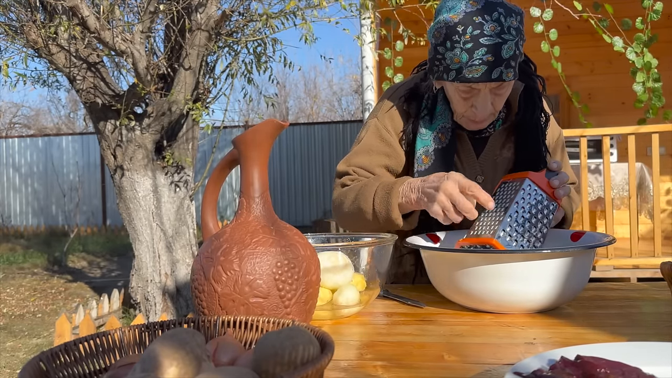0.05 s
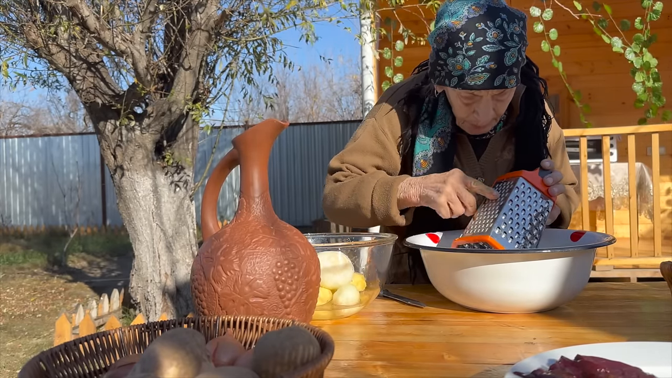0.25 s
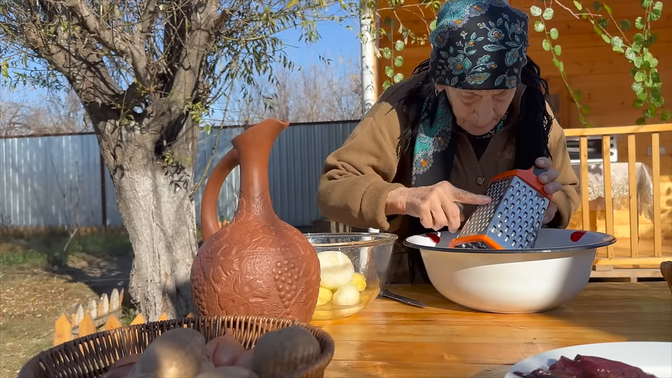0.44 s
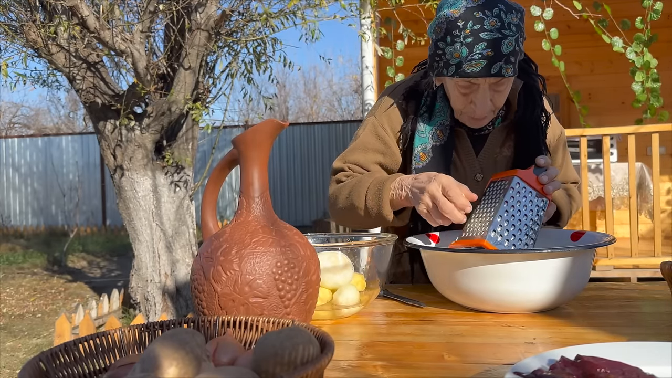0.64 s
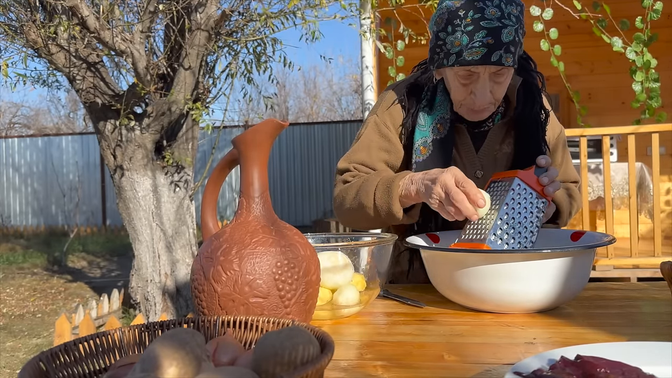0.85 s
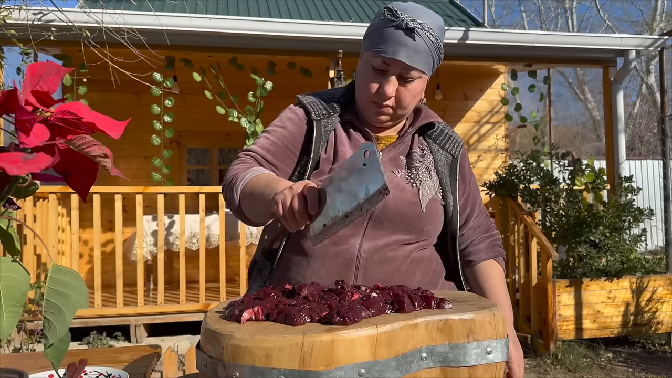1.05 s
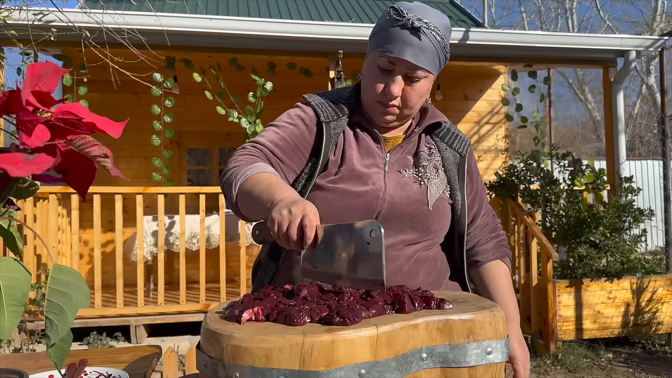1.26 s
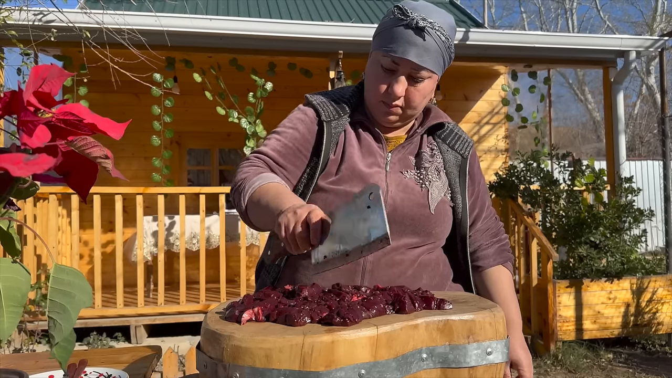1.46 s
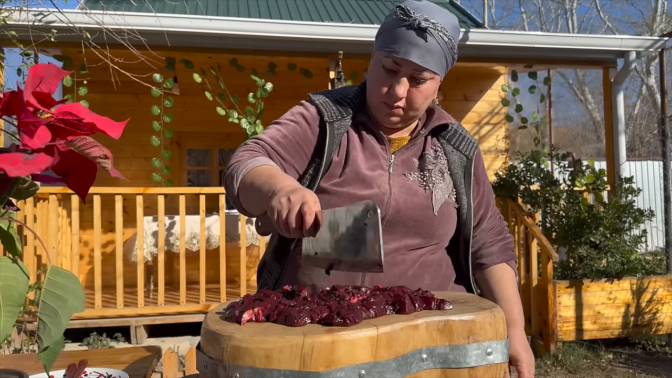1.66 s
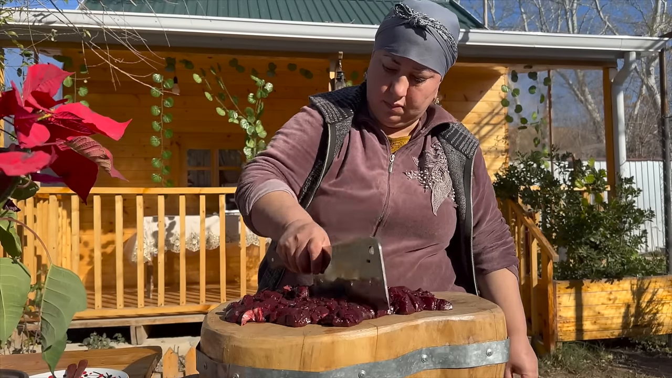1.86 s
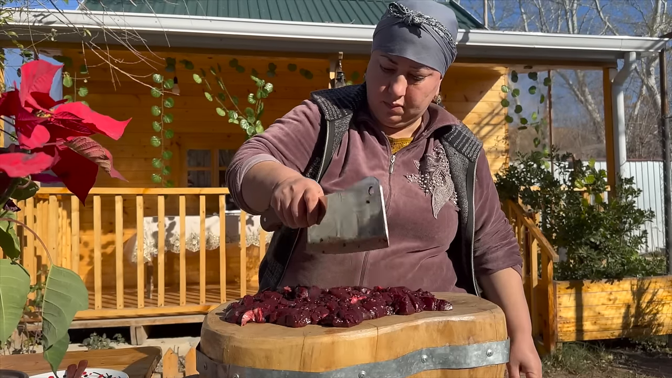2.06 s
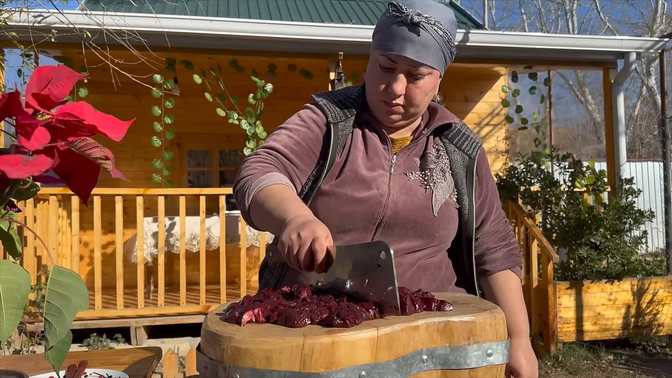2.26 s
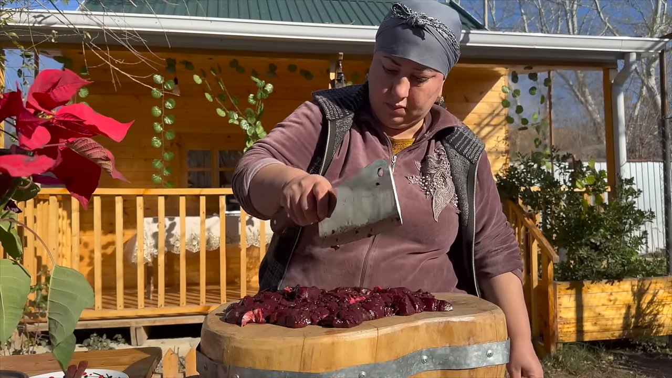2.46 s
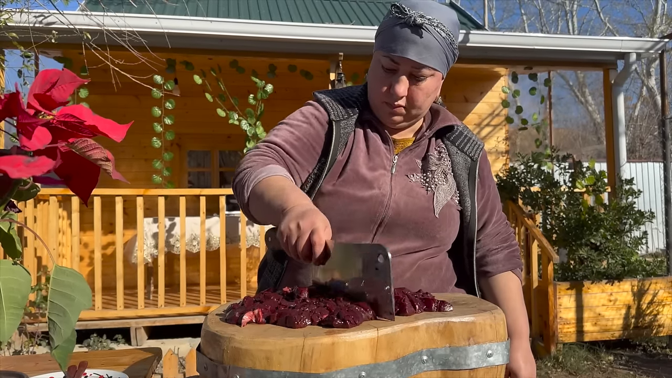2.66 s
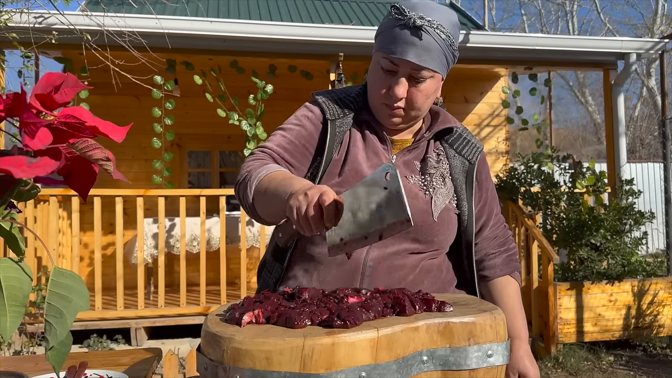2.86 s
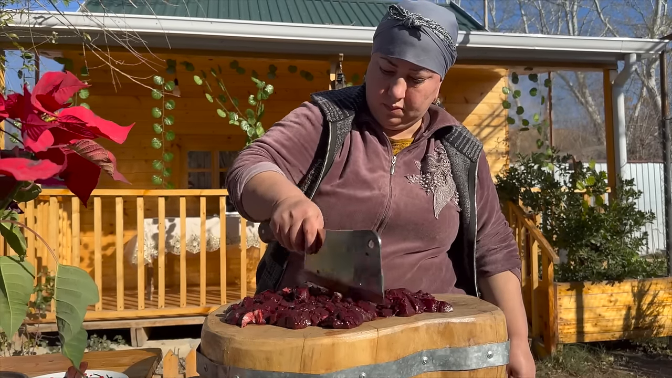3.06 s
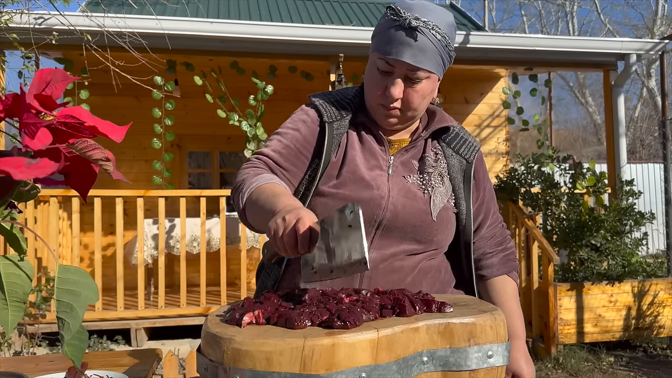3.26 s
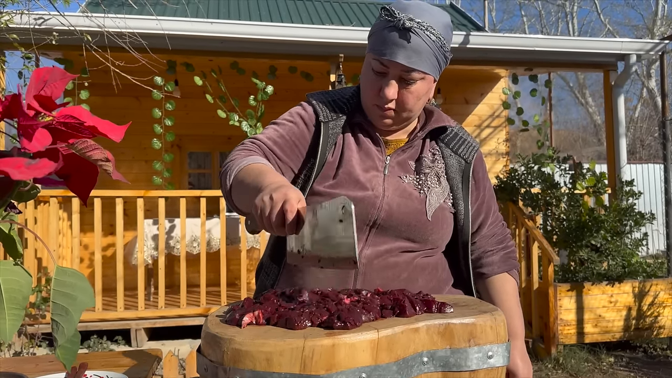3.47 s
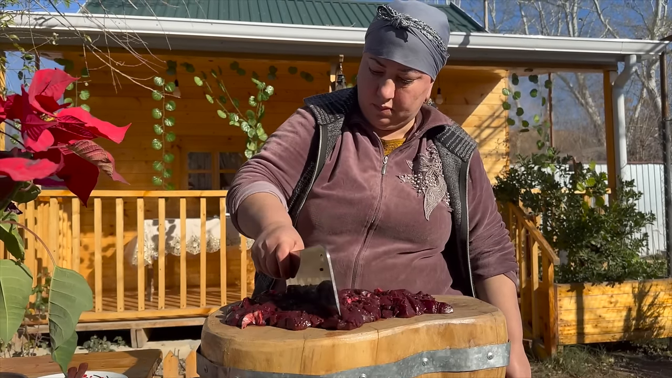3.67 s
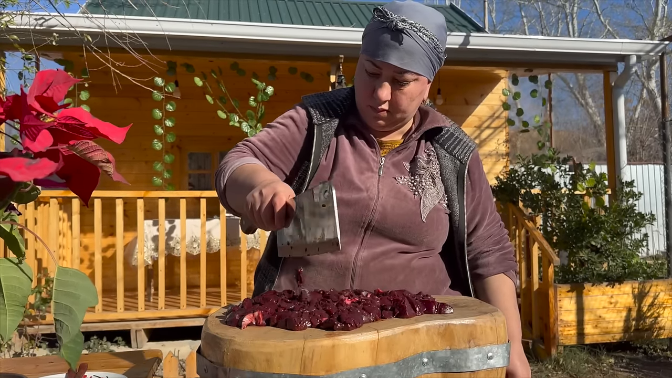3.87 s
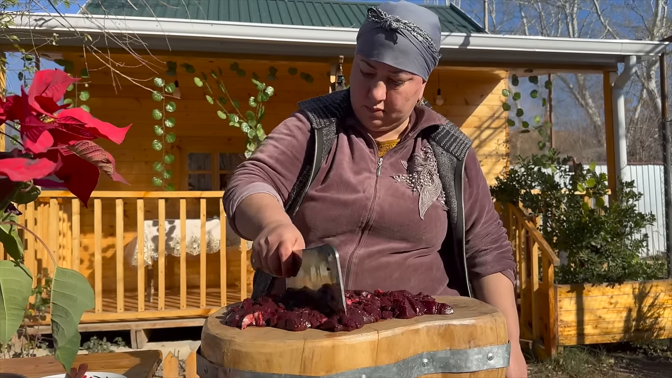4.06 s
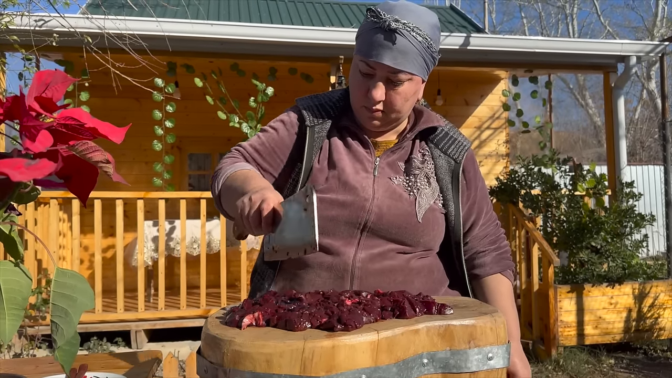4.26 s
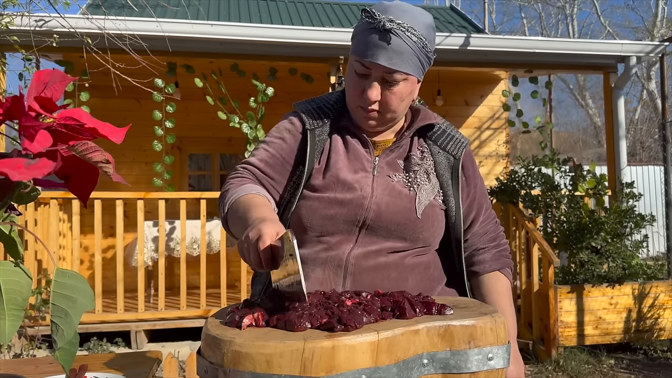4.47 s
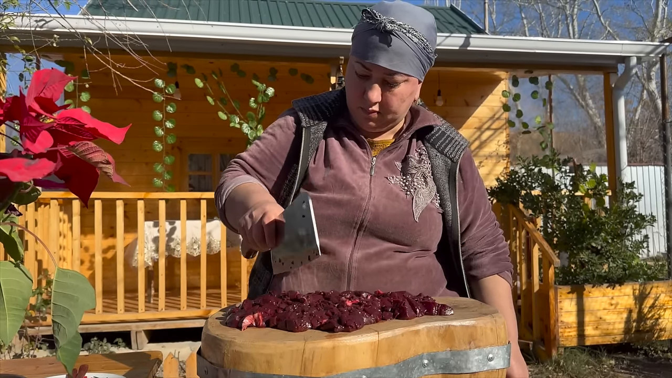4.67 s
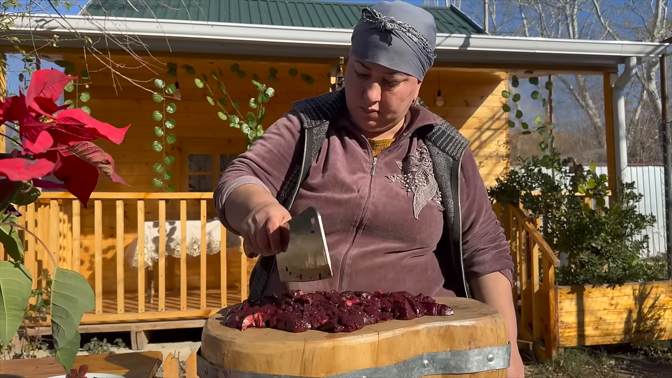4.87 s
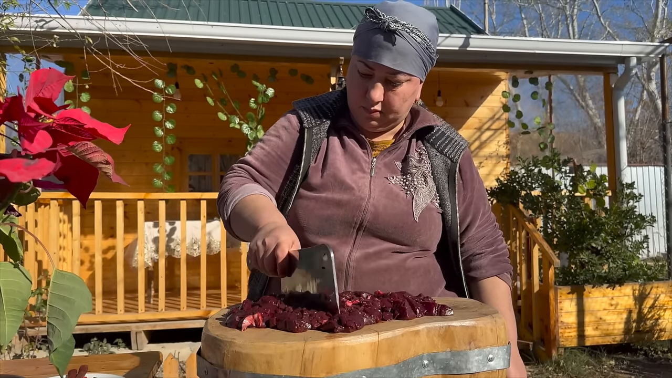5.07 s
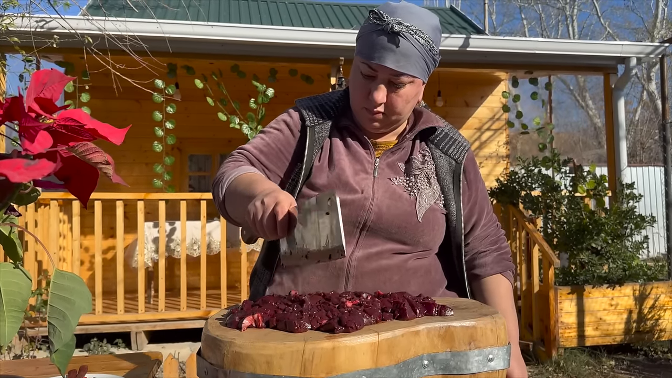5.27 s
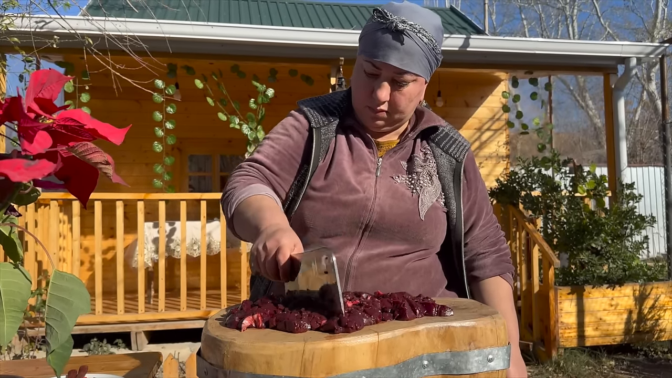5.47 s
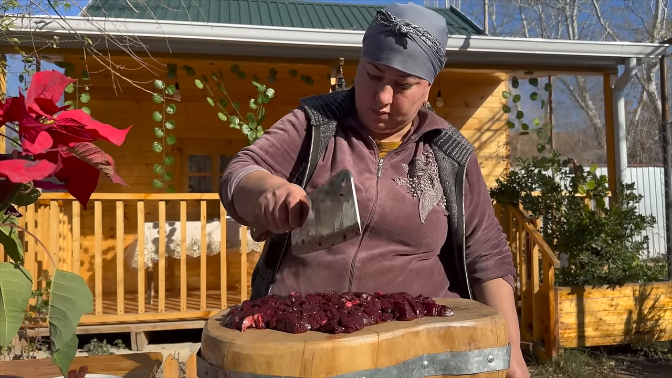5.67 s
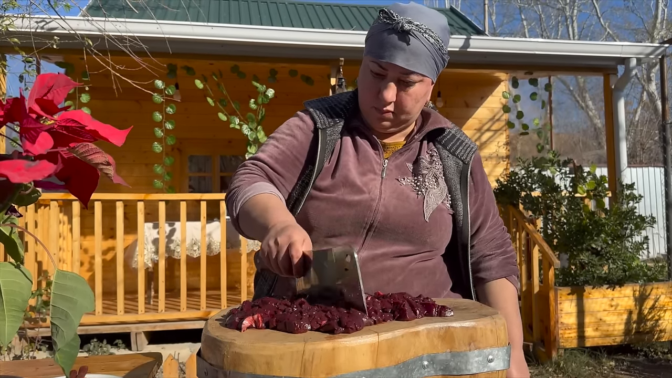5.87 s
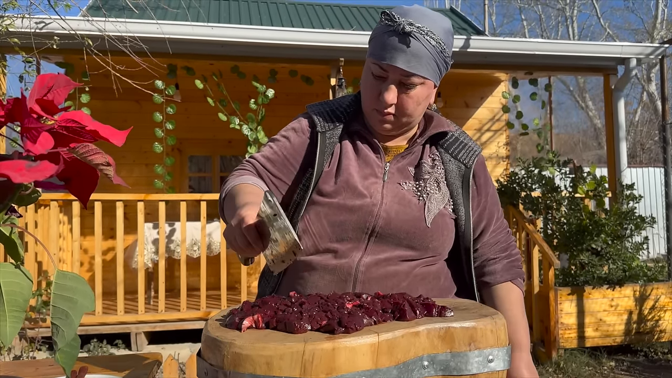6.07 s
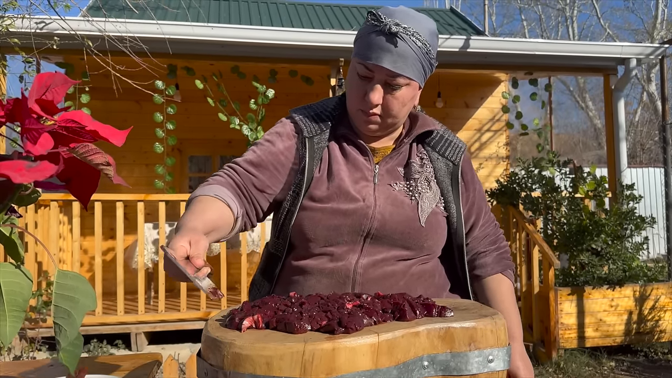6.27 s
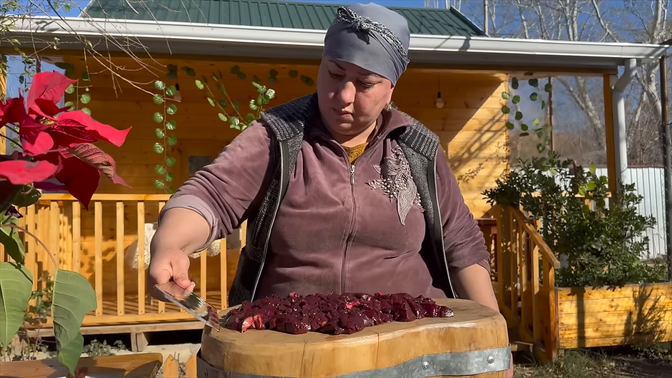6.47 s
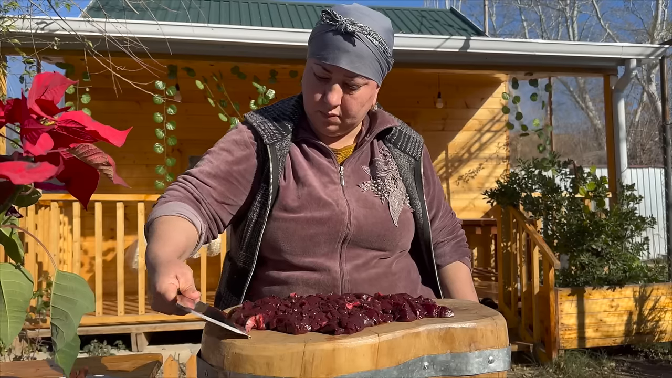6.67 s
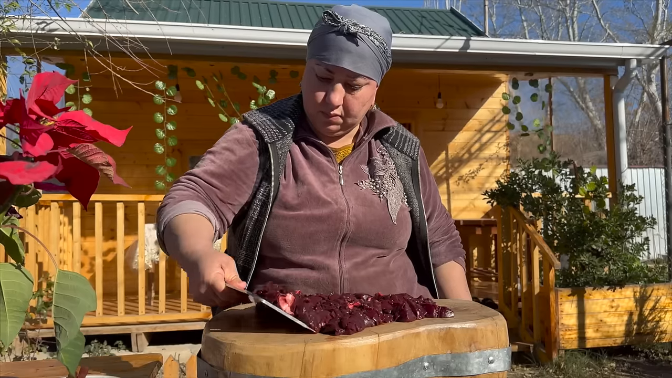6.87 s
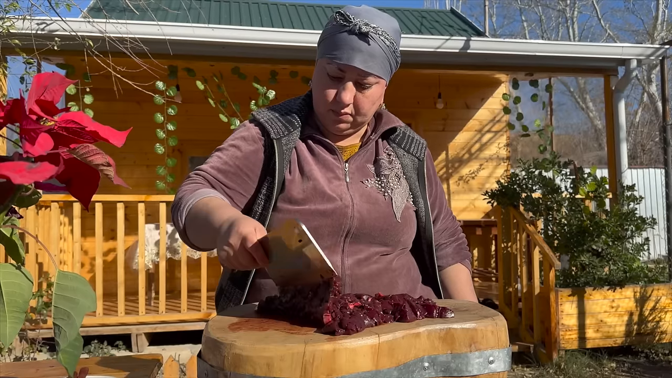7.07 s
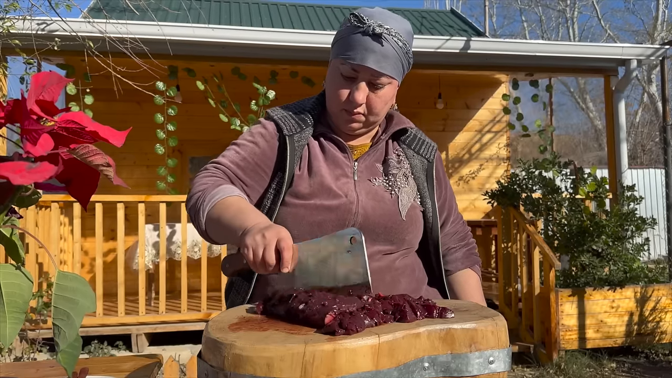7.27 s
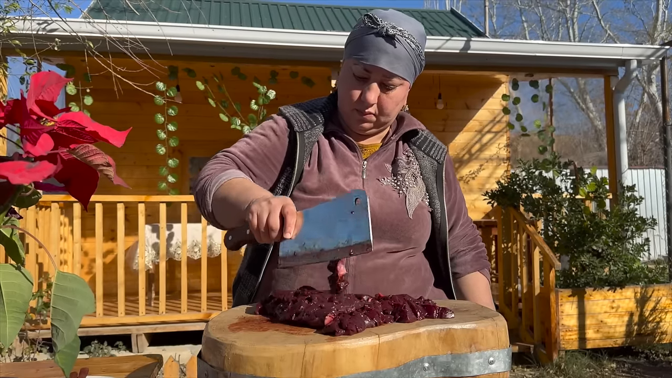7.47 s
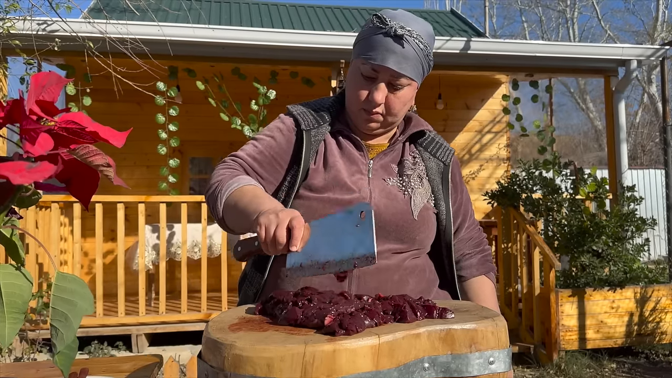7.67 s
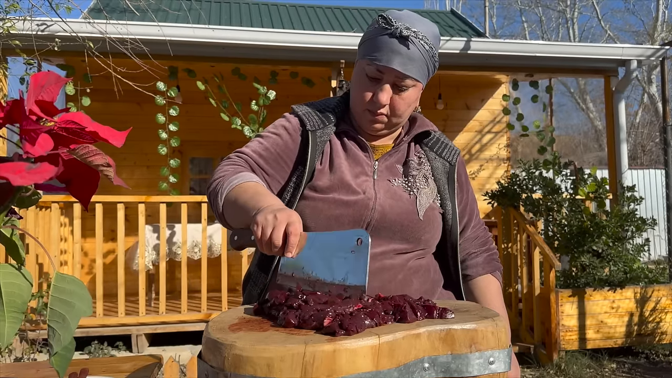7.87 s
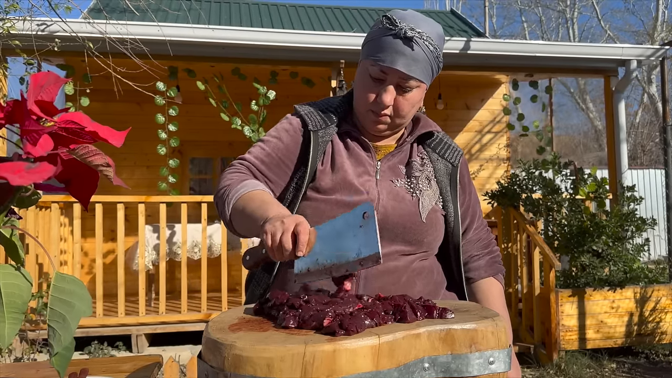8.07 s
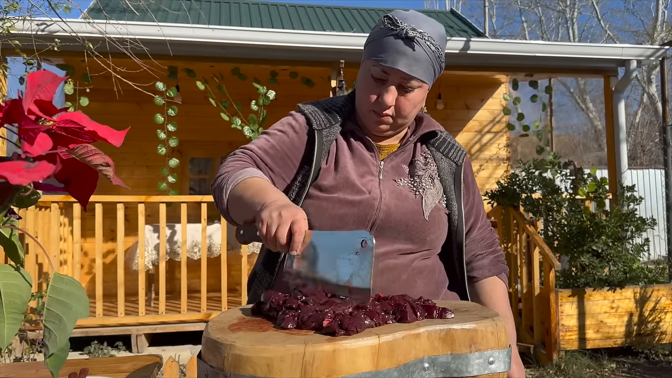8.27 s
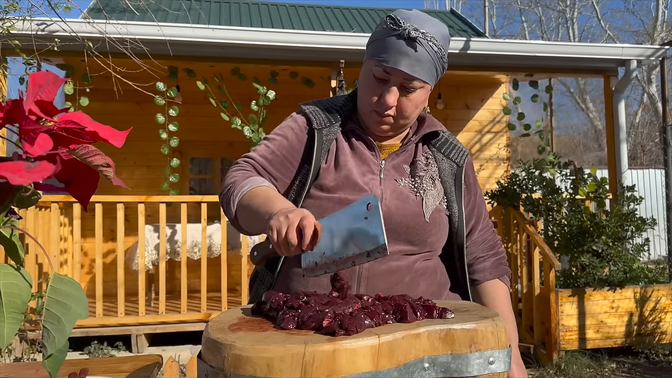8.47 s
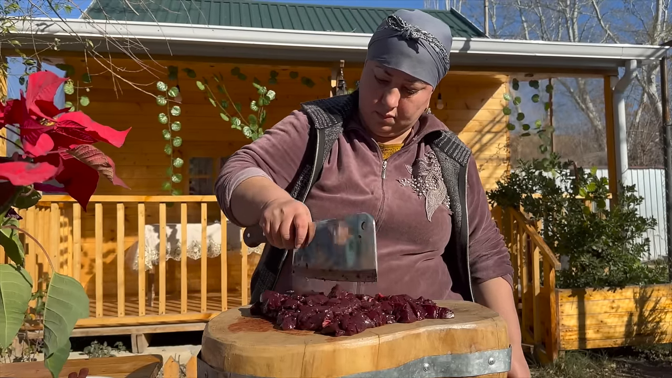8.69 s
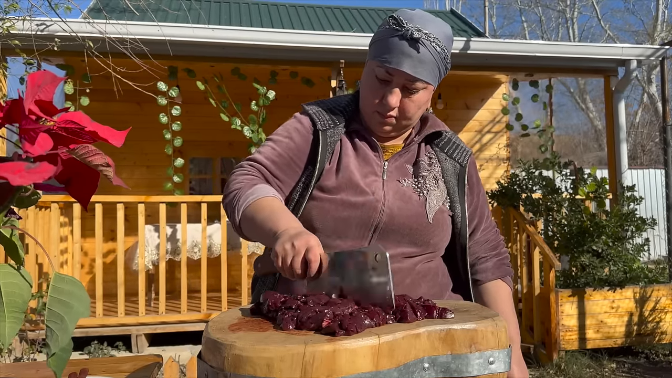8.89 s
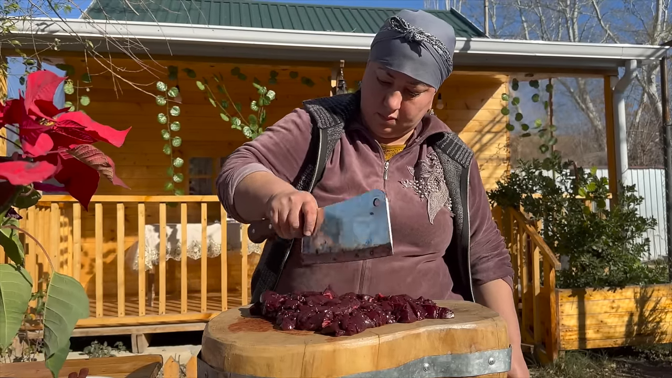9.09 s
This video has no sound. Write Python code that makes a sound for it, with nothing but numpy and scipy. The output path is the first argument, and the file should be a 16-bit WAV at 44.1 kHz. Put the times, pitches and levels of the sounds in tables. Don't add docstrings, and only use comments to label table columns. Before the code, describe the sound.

Outdoor yard beside a wooden porch, heard fairly close: quiet onion grating with a soft bowl knock, then a sudden change to regular, loud cleaver chops through wet meat into wood. Sticky clicks follow as the blade lifts. Midway the blade slaps flat and drags with a short steel-on-wood scrape and wet folding sounds, before a few spaced, softer chops. Faint traffic, wind buffeting and thin bird calls lie beneath.

```python
import sys
import numpy as np
from scipy import signal
from scipy.fft import rfft, irfft, next_fast_len
from scipy.io import wavfile
from scipy.ndimage import uniform_filter1d, map_coordinates

SR = 44100
rng = np.random.default_rng(int(sys.argv[2]) if len(sys.argv) > 2 else 0)


def unload_audio(sound):
    columns = np.transpose(np.atleast_2d(sound))
    steps = np.round(np.clip(columns, -1, 1) * 32767)
    wavfile.write(sys.argv[1], SR, steps.astype(np.int16))


def ratio(d):
    e = np.asarray(d, float) / 20
    return 10 ** e


N = 402633
T = np.arange(N) / SR

# t/s, wood level/dB, thump level/dB above wood, blade level/dB above wood, wood f/Hz
BLOWS = [(1.1765, -20, -5, 0, 1340), (1.5401, -23, -2, -3, 1596), (1.8899, -24, -4.5, -1.5, 1577),
         (2.2546, -29.5, 1.5, -3, 1287), (2.6218, -23, 0.5, 4.5, 1320), (2.983, -44, 3, 1.5, 1230),
         (3.3335, -21.5, -1.5, 0, 1542), (3.681, -27.5, -3, -5, 1605), (4.0373, -24, -4, -6.5, 1210),
         (4.3919, -27.5, -6, -10, 1158), (5.11, -16.5, -7.5, -4, 1575), (5.469, -21.5, 0, 1, 1400),
         (5.8227, -22.5, -2, -6, 1590), (6.5534, -41.5, -7.5, 5.5, 1970), (8.1539, -31, 0.5, -3, 1590),
         (8.9289, -24.5, -2, -5.5, 1590)]
# grain f/Hz, edge f/Hz, spine f/Hz, share of ring the meat leaves
SPOTS = [(673, 2940, 3990, .7), (885, 2840, 3990, 1.2), (860, 2560, 4290, .9), (896, 2450, 3960, .9),
         (735, 2500, 4050, .8), (635, 2230, 3540, 1.1), (894, 2820, 4110, 1.1), (886, 2970, 4010, 1.1),
         (880, 2610, 4050, 1.1), (883, 2300, 4390, 1.1), (881, 2860, 3390, .9), (657, 2380, 3980, 1.1),
         (899, 2200, 3850, 1.1), (923, 2470, 3890, 1.1), (883, 2410, 3680, 1.1), (894, 2180, 3930, .9)]
# low grain level/dB, high grain level/dB, edge level/dB, spine level/dB
REACH = [(-4, 6, 4, 2), (1, 2, 0, -2), (-6, 4, -1, 1), (7, 0, -1, 3), (-2, 1, -1, 0), (-3, 1, 0, 4),
         (0, 1, 0, -2), (2, 1, -2, 6), (3, 1, -3, -4), (1, -4, 0, -3), (1, 1, 4, 5), (-3, -2, 0, -1),
         (2, -3, -3, 2), (2, -2, 0, 3), (4, -1, 3, -4), (3, -1, -2, -3)]
# f/Hz, level/dB, t60/s
LOG_THUMP = [(200, -3, 0.022), (268, 2.5, 0.02), (355, 0.5, 0.032), (430, 2, .028), (499, 3, .028)]
# f/Hz, level/dB, t60/s
WOOD_GRAIN = [(610, -8.5, .026), (720, -6, 0.024), (1030, -10, .02), (1400, -7.5, 0.024), (1590, -15, .06)]
# f/Hz, level/dB, t60/s
BLADE_RING = [(2180, -4.5, .012), (2600, -8, 0.012), (3400, -8, 0.011), (4200, -10, .011),
              (4800, -9, 0.009), (5530, -9.5, .009), (6490, -18, 0.01)]
# f/Hz, level/dB, t60/s
FLAT_TAP = [(2490, 2.5, 0.067), (2800, -23, 0.099), (4200, -17.5, 0.12), (5620, -15, 0.02),
            (6700, -20, 0.06), (7240, -27, 0.059), (8800, -21, 0.043)]
# f/Hz, level/dB, t60/s
PORCH_HOLLOW = [(344, 0.5, 0.18), (200, -6, 0.054)]
# delay t/s, level/dB
ECHOES = [(.005, -23), (.012, -31.5), (.024, -36.5), (0.037, -38), (.084, -44), (.149, -53.5), (.21, -63.5)]
# f/Hz, t60/s
NEAR_SCATTER = [(150, 0.05), (500, 0.17), (1200, .14), (2400, 0.095), (5000, 0.042), (12000, 0.057)]
# f/Hz, t60/s
FAR_SCATTER = [(150, 0.12), (400, 0.25), (900, 0.72), (2000, .75), (3600, .66), (6000, 0.36), (12000, 0.15)]

# entry t/s, bottom t/s, wetness level/dB, crack level/dB at the bottom, pull-out fizz level/dB
CUTS = [(1.165, 1.176, -36, -27.5, -74.5), (1.526, 1.536, -52, -35, -81), (1.877, 1.888, -44, -36, -76.5),
        (2.242, 2.253, -47.5, -30, -76.5), (2.612, 2.62, -48, -30, -72), (2.977, 2.986, -42, -44, -73.5),
        (3.319, 3.331, -46, -35, -74), (3.657, 3.681, -48.5, -41, -72.5), (4.023, 4.035, -48, -40, -72.5),
        (4.378, 4.392, -47.5, -49, -79), (4.737, 4.75, -48, -50, -77.5), (5.097, 5.108, -47.5, -34, -72.5),
        (5.458, 5.469, -41.5, -35.5, -75), (5.81, 5.819, -53, -34, -79.5), (6.221, 6.234, -68.5, -79, -93),
        (7.733, 7.747, -44, -54, -84), (8.13, 8.153, -48, -47, -79.5), (8.534, 8.552, -48.5, -47.5, -86.5),
        (8.911, 8.923, -51, -33, -73.5)]
# f/Hz, level/dB per Hz
SPRAY = [(1000, -80), (3000, -15.5), (5000, -2), (8000, -4), (12000, -8.5), (16000, -18)]
# f/Hz, level/dB per Hz
SQUELCH = [(60, -60), (250, -10), (700, -4), (2500, 0), (4500, -4), (7000, -16), (12000, -60.5)]
# t/s, peak level/dB, f/Hz
SMACKS = [(.903, -58, 4970), (1.239, -47.5, 5200), (2.001, -56, 3500), (2.288, -53, 4700), (2.3, -46, 9940),
          (2.323, -47.5, 6000), (2.36, -54.5, 8800), (2.693, -51, 3400), (2.712, -46.5, 11800),
          (3.05, -56, 3800), (3.067, -56, 8300), (3.745, -53.5, 4000), (3.766, -59, 4800),
          (3.775, -52, 4400), (3.791, -53, 4800), (4.105, -54, 5400), (4.14, -51, 4400), (4.146, -48, 4400),
          (4.438, -60, 9100), (4.786, -54, 12100), (4.804, -54, 2900), (4.841, -55, 2693),
          (4.866, -53.5, 5800), (6.241, -57, 3200), (7.855, -51, 3700), (7.866, -53, 3400),
          (7.88, -56, 4100), (8.646, -48, 3110), (8.652, -48, 3400), (9.023, -56, 4500)]
# t/s, peak level/dB, f/Hz
FOLDS = [(6.839, -49, 3400), (6.851, -44, 11700), (6.874, -51, 2800), (6.883, -57, 3130),
         (6.907, -56, 3100), (6.934, -55, 4800), (6.941, -59, 4000), (6.957, -58, 3920), (6.973, -51, 8250),
         (7.0, -56.5, 4600), (7.058, -54, 6100), (7.31, -59, 3780), (7.328, -57, 9900),
         (7.415, -61.5, 6300), (7.441, -52, 9380), (7.544, -58, 14000)]
# t/s, peak level/dB, f/Hz
SPLATS = [(0.7692, -66, 2600), (0.8982, -66, 3700), (1.1726, -36, 5500), (1.2706, -59, 12400),
          (1.4963, -80, 7400), (1.53, -54, 6200), (1.8814, -41, 12400), (2.3369, -66, 10500),
          (2.7006, -68, 10500), (2.7532, -68, 7400), (3.037, -64, 7400), (3.0433, -62, 6200),
          (3.0627, -64, 6200), (3.0979, -67, 8800), (3.3147, -68, 4400), (3.3231, -45, 8800),
          (3.3281, -37, 7400), (3.3743, -68, 14800), (3.4132, -69, 14800), (3.4351, -64, 14800),
          (3.6719, -57, 12400), (3.6758, -58, 14800), (3.7387, -67, 14800), (3.7557, -55, 14800),
          (3.7948, -72, 7400), (3.8023, -72, 14800), (4.0308, -46, 10500), (4.1725, -67, 12400),
          (4.2012, -75, 7400), (4.383, -54, 10500), (4.4685, -64, 14800), (4.481, -64, 12400),
          (4.7394, -37, 12400), (4.7434, -50, 12400), (4.7502, -45, 2600), (4.7556, -53, 3100),
          (4.7611, -54, 14800), (4.7699, -52, 5200), (4.8809, -64, 14800), (5.0989, -54, 12400),
          (5.1031, -50, 14800), (5.2268, -65, 7400), (5.4583, -61, 3100), (5.4633, -36, 3100),
          (5.5845, -71, 10500), (5.8132, -52, 7400), (5.8182, -60, 8800), (6.2473, -71, 7400),
          (6.8322, -57, 8800), (6.8696, -62, 3100), (6.901, -62, 12400), (6.9175, -66, 10500),
         (6.9778, -66, 8800), (6.9841, -71, 12400), (7.0232, -67, 8800), (7.037, -67, 10500),
         (7.1031, -73, 2600), (7.2116, -70, 3100), (7.2168, -71, 8800), (7.23, -73, 10500),
         (7.236, -71, 12400), (7.258, -66, 2600), (7.2762, -73, 7400), (7.3048, -71, 3700),
         (7.3917, -71, 2600), (7.447, -65, 14800), (7.468, -66, 8800), (7.4765, -65, 7400),
         (7.7414, -51, 2200), (7.7471, -51, 6200), (7.7536, -54, 6200), (7.77, -57, 2200),
         (7.8284, -59, 5200), (7.8506, -63, 5200), (7.8741, -62, 7400), (7.9085, -75, 10500),
         (7.9334, -72, 10500), (8.0073, -79, 4400), (8.1245, -66, 10500), (8.1372, -50, 7400),
         (8.1464, -44, 14800), (8.2312, -62, 8800), (8.2894, -66, 4400), (8.3647, -72, 8800),
         (8.4038, -71, 12400), (8.4201, -71, 14800), (8.5343, -58, 6200), (8.5503, -53, 10500),
         (8.558, -49, 12400), (8.6159, -69, 8800), (8.6381, -68, 8800), (8.6742, -62, 5200),
         (8.8179, -78, 10500), (8.8476, -74, 4400), (8.9139, -56, 10500), (8.9179, -51, 12400),
         (8.9224, -51, 12400), (8.9938, -68, 7400), (9.0454, -62, 12400), (9.0796, -77, 10500)]
# t/s, fizz level/dB, time to fall 20 dB t/s
CLINGS = [(.905, -72, .025), (6.245, -72, .03), (6.83, -63, .22), (7.02, -77, .06), (7.06, -75, .05),
          (7.2, -85, .08), (7.265, -80, .05), (7.31, -72, .045), (7.41, -82, .05), (7.46, -79, .04),
          (7.78, -76, .06), (7.86, -67, .055), (7.93, -85, .09), (8.26, -82, .05), (8.61, -82, .05),
          (8.65, -63, .045)]
# f/Hz, level/dB per Hz
FIZZ = [(500, -60), (2000, -5.5), (3500, 0.5), (7000, -5), (12000, -6), (16000, -17)]

# t/s, steel level/dB
DRAG = [
    (6.558, -49),
    (6.61, -67.5),
    (6.65, -59.5),
    (6.69, -58),
    (6.75, -48),
    (6.775, -51.5),
    (6.8, -43.5),
    (6.83, -57.5),
    (6.895, -71),
]
# f/Hz, width f/Hz, level/dB
BLADE_RUB = [(2190, 23, -6), (2513, 56.5, 2), (3750, 40, -6), (3900, 90, -7), (5550, 150, -12),
             (6500, 53, -8.5), (7250, 45, -10.5), (11570, 62.8, -20.5)]
# f/Hz, width f/Hz, level/dB
BLOCK_RUB = [(253, 73, -3.5), (532, 60, 1), (1354, 44, -4)]
# f/Hz, level/dB per Hz
GRIT = [(160, -12), (538, -4.5), (821, -20), (1320, -3), (1680, -8), (3970, -2), (6000, -7), (16000, -32)]
# start t/s, hold t/s, tooth level/dB, body level/dB above it
STROKES = [
    (0.01, 0.09, -62.5, 2.5),
    (.14, .01, -82, 2),
    (0.212, .002, -79, -4),
    (0.253, .015, -80, 2),
    (.435, .002, -83, -11),
    (0.471, .002, -72, -4),
    (0.524, 0.022, -67, 2),
]
# f/Hz, width f/Hz, level/dB
GRATER = [(2180, 110, -11), (2500, 70, -3), (3340, 72, -14), (3830, 34, -0.5), (4560, 95, -17),
          (5600, 59, -13), (6600, 91, -14.5)]
# f/Hz, width f/Hz, level/dB
BOWL = [(674, 50, -3), (1022, 70, -3), (1320, 120, -6)]
# t/s, level/dB, f/Hz, t60/s
KNOCKS = [(.677, -59, 333, 0.049), (.767, -57, 629, 0.088), (.767, -64, 2500, .05), (.776, -68, 2700, 0.1),
          (.799, -45, 200, 0.093), (.799, -54.5, 324, 0.061), (.8, -52, 130, .09), (2.988, -27, 200, 0.032),
          (2.988, -42, 610, 0.023), (8.541, -50.5, 210, 0.057), (4.74, -55.5, 200, 0.056),
          (6.556, -34, 519, 0.058), (6.222, -52.5, 228, .05), (6.22, -59, 685, 0.044)]

# start t/s, length t/s, f/Hz, scoop up from f/Hz below, peak level/dB
BIRDS = [
    (.725, .085, 2165, -4, -74),
    (.812, .088, 2173, 0, -68),
    (1.303, .06, 4240, 1300, -58),
    (1.356, .34, 4240, 1301.5, -56),
    (1.415, 0.0485, 4220, 1200, -71.5),
    (4.576, 0.18, 4350, -0.5, -84.5),
    (6.901, .28, 4122, 0, -79),
    (8.27, .23, 4350, -4, -86),
    (8.68, 0.049, 7200, 1.5, -84),
]
# t/s, buffet level/dB
WIND = [(0, -60), (.4, -55), (.8, -59), (.92, -48.5), (1.5, -42.5), (2.2, -45.5), (2.55, -45), (2.88, -51),
        (3.24, -42), (3.55, -52.5), (4.3, -47), (4.8, -53.5), (5.8, -51), (6.15, -55), (6.48, -46.5),
        (7.56, -57.5), (8.2, -50.5), (9.13, -57)]
# f/Hz, level/dB per Hz
BUFFET = [(5, -120), (12, -15), (22, 2), (45, -3), (70, -21.5), (200, -120)]
# f/Hz, level/dB per Hz
RUMBLE = [(20, -120), (40, -20), (60, 0), (100, -5), (150, -20.5), (330, -27.5), (900, -120)]
# f/Hz, level/dB per Hz
HUSH = [(71, -30.5), (120, -0.5), (250, -12), (1130, -14.5), (4320, -30), (6010, -34.5), (13700, -37.5),
        (16500, -51.5)]
# f/Hz, width f/Hz, level/dB
MOTOR_HUM = [(73, 3, 0), (50, 5, -4)]


def unit(x):
    return x / np.sqrt(np.mean(x ** 2) + 1e-20)


def along(points, hz):
    f, v = np.transpose(points)
    return np.interp(np.log(hz + 1), np.log(f + 1), v)


def level_curve(rows):
    s, db = np.transpose(rows)
    return np.interp(T, s, db, -150, -150)


def swell(s, hold, db, rise, fall):
    before = (s - T) / rise
    after = (T - s - hold) / fall
    return db - 20 * np.maximum(np.maximum(before, after), 0)


def wobble(rate):
    knots = rng.standard_normal(int(N * rate / SR) + 4)
    return map_coordinates(knots, [T * rate], order=1)


def white():
    return rng.standard_normal(N)


def grains(spike_db):
    sizes = rng.exponential(size=N // 24 + 1).repeat(24)[:N]
    return white() * ratio(spike_db * sizes)


def filtered(x, response):
    m = next_fast_len(N + SR // 2)
    spectrum = rfft(x, m) * response(np.fft.rfftfreq(m, 1 / SR))
    return unit(irfft(spectrum, m)[:N])


def coloured(x, spectrum):
    return filtered(x, lambda hz: ratio(along(spectrum, hz)))


def resonant(x, peaks):
    def response(f):
        total = 0
        for k, (centre, width, db) in enumerate(peaks):
            damping = 1j * f * width
            total = total + (-1) ** k * ratio(db) * damping / (centre * centre - f * f + damping)
        return total
    return filtered(x, response)


def ring(modes, t, scatter_db, attack):
    total = np.zeros(len(t))
    for hz, db, t60 in modes:
        detune = 1 + .012 * scatter_db * rng.standard_normal()
        decay = ratio(db + rng.normal(0, scatter_db) - 60 * t / t60)
        total -= decay * np.sin(2 * np.pi * hz * detune * t)
    return total * (1 - np.exp(-t / attack))


def add(track, s, x):
    part = track[round(s * SR):][:len(x)]
    part += x[:len(part)]


def tail(decays, count):
    hz, t, z = signal.stft(rng.standard_normal(count), SR, nperseg=256)
    fading = ratio(-60 * t / along(decays, hz)[:, None])
    x = signal.istft(z * fading, SR, nperseg=256)[1]
    return x / np.linalg.norm(x)


def yard(x, crack):
    scatter = ratio(-34) * tail(FAR_SCATTER, count=SR // 2)
    add(scatter, 0, ratio(-18.5) * tail(NEAR_SCATTER, count=SR // 6))
    walls = np.zeros(SR // 4)
    walls[0] = 1
    plank_hz = 1500
    plank = np.hanning(48) * np.sin(2 * np.pi * plank_hz * np.arange(48) / SR)
    for delay, db in ECHOES:
        if delay < .05:
            copy = rng.uniform(size=9)
        else:
            copy = ratio(-13) * plank
        add(walls, delay, ratio(db) * copy)
    late_crack = np.pad(crack, (SR // 160, 0))
    out = signal.fftconvolve(late_crack, scatter)
    add(out, 0, signal.fftconvolve(x, walls))
    return out


def blows():
    out = np.zeros(N)
    t = np.arange(SR // 5) / SR
    snap = -np.sin(2 * np.pi * 1900 * t) * ratio(-60 * t / .0008)
    snap /= np.linalg.norm(snap)
    snap_share = 0.65
    for blow, spot, reach in zip(BLOWS, SPOTS, REACH):
        s, db, thump_db, steel_db, wood_hz = blow
        grain_hz, edge_hz, spine_hz, share = spot
        low_db, high_db, edge_db, spine_db = reach

        def wood(modes):
            return [(hz, level + (low_db if hz < 1100 else high_db), t60) for hz, level, t60 in modes]

        def steel_reach(hz):
            if hz < 3300:
                return edge_db
            return spine_db if hz < 4500 else 0

        def steel(modes):
            return [(hz, level + steel_reach(hz), t60) for hz, level, t60 in modes]

        local_wood = [(wood_hz, -3, .022 * share), (grain_hz, -3, .028 * share)]
        local_steel = [(edge_hz, -3, .014 * share), (spine_hz, -6, .012 * share)]
        wood_gain, steel_gain = ratio(12.5), ratio(steel_db + 16.5)
        knock = ratio(thump_db + 5) * ring(LOG_THUMP, t, scatter_db=1, attack=.0009)
        knock += wood_gain * ring(wood(WOOD_GRAIN), t, scatter_db=2, attack=.0015)
        knock += wood_gain * ring(wood(local_wood), t, scatter_db=.3, attack=.0012)
        knock += steel_gain * ring(steel(BLADE_RING), t, scatter_db=2.5, attack=.0015)
        knock += steel_gain * ring(steel(local_steel), t, scatter_db=.3, attack=.0015)
        knock *= ratio(-60 * t * max(1 / share - 1, 0) / .03)
        first = ratio(10.5 - 60 * t / 0.0091) * knock
        crack = (1 - snap_share) * first + snap_share * np.linalg.norm(first) * snap
        add(out, s, ratio(db) * yard(knock, crack))
        hollow = ring(PORCH_HOLLOW, t, scatter_db=0.4, attack=.004)
        add(out, s + .035, ratio(db + thump_db - 15.5) * hollow)
    add(out, 6.5537, ratio(-29.5) * ring(FLAT_TAP, t, scatter_db=0, attack=0.00025))
    return out


def cuts():
    spray, squelch = np.zeros(N), np.zeros(N)
    squelch_db = 6
    for entry, bottom, spray_db, crack_db, _ in CUTS:
        t = np.arange(round((bottom - entry + .1) * SR)) / SR + entry - bottom
        to_go = np.clip(-t / (bottom - entry), 0, 1)
        after = np.clip(t - .004, 0, 1)
        sinking = ratio(spray_db + 2.5 - 21 * to_go ** 1.2)
        cracking = ratio(crack_db - 60 * after / 0.016)
        add(spray, entry, np.where(t < 0, sinking, cracking))
        add(squelch, entry, ratio(spray_db + squelch_db - 2 - 18 * to_go ** 1.5 - 60 * after / 0.013))
    wet = spray * coloured(grains(spike_db=4.0), SPRAY)
    wet += squelch * coloured(grains(spike_db=2.5), SQUELCH)
    return yard(wet, crack=ratio(-7) * wet)[:N]


def smacks():
    out = np.zeros(N)
    t = np.arange(-40, 260) / SR
    ticks = [(s, db + 3, hz) for s, db, hz in SPLATS]
    for s, db, hz in SMACKS + FOLDS + ticks:
        breadth = 0.2 + .25 * rng.uniform()
        phase = rng.uniform(size=3)
        life = .5 / (hz * breadth)
        spread = np.minimum(hz * 2 ** (breadth * np.array([-1.1, 0, 1.1])), 15500)
        wave = np.cos(2 * np.pi * (np.outer(t, spread) + phase)) @ [.4, 1, .4]
        envelope = np.exp(-np.where(t < 0, -3 * t, t) / life)
        add(out, s + t[0], ratio(db + 6) * wave * envelope)
    cling_db = [swell(s, 0, db, .03, fall) for s, db, fall in CLINGS]
    cling = ratio(np.max(cling_db, axis=0) + 2)
    pull = signal.windows.tukey(round(.125 * SR), .5)
    for _, bottom, *_, pull_db in CUTS:
        add(cling, bottom + 0.026, ratio(pull_db + 2.5) * pull)
    fizz = grains(spike_db=3.1) * ratio(2.2 * wobble(90))
    return out + cling * coloured(fizz, FIZZ)


def rub():
    return grains(spike_db=2.5) * ratio(2.1 * wobble(70))


def friction(high_db, low_db, high, low, grit_db):
    top = resonant(rub(), high) + ratio(grit_db) * coloured(rub(), GRIT)
    top /= np.sqrt(1 + ratio(2 * grit_db))
    return ratio(high_db + 2.5) * top + ratio(low_db - 0.5) * resonant(rub(), low)


def scraping():
    steel_db = level_curve(DRAG)
    wood_db = -60 + 0.18 * (steel_db + 57)
    wood_db = np.minimum(wood_db, steel_db + 1.5)
    grit_db = 5.5 + 0.43 * (steel_db + 44.5)
    return friction(steel_db, wood_db, BLADE_RUB, BLOCK_RUB, grit_db)


def grating():
    teeth, body = [], []
    for s, hold, db, body_db in STROKES:
        stroke = swell(s, hold, db, rise=0.02, fall=0.03)
        teeth.append(stroke)
        body.append(stroke + body_db)
    grit_db = np.where(T < .17, 0, 5)
    return friction(np.max(teeth, axis=0), np.max(body, axis=0), GRATER, BOWL, grit_db)


def shifting(x, depth_db):
    z = signal.stft(x, nperseg=512)[2]
    field = uniform_filter1d(rng.standard_normal(z.shape), size=7, axis=0)
    field = uniform_filter1d(field, size=7, axis=1)
    patches = ratio(depth_db * (unit(field) - 0.52))
    return signal.istft(z * patches, nperseg=512)[1][:N]


def knocks():
    out = np.zeros(N)
    t = np.arange(SR // 8) / SR
    for s, db, hz, t60 in KNOCKS:
        add(out, s, ring([(hz, db, t60)], t, scatter_db=1.5, attack=0.00075))
    return out


def birds():
    out, waver, flutter = np.zeros(N), wobble(130), wobble(120)
    scoop_s, rise_s, fade_s = .038, .016, .076
    for s, length, hz, scoop_hz, db in BIRDS:
        t = np.arange(round(length * SR)) / SR
        k = round(s * SR) + np.arange(len(t))
        scoop = scoop_hz * np.clip(1 - t / scoop_s, 0, 1) ** 1.3
        pitch = (hz - scoop) * (1 + .012 * waver[k])
        if scoop_hz > 300:
            fade_db = 19 * (1 - np.exp(-t / fade_s))
        else:
            fade_db = 2 * t / length
        level = ratio(db - 4 - fade_db + 2.9 * flutter[k]) * np.minimum(t / rise_s, 1)
        out[k] += level * np.sin(2 * np.pi * np.cumsum(pitch) / SR)
    far = signal.fftconvolve(out, tail(FAR_SCATTER, count=SR // 3))[:N]
    return ratio(-7) * out + ratio(-7.5) * far


def air():
    at_table = T < .88
    buffet_db = level_curve(WIND)
    gusts_db = buffet_db - buffet_db.mean()
    rumble_db = -64 + .45 * gusts_db + 4.5 * at_table
    buffet = ratio(buffet_db - 3.5) * unit(ratio(4 * wobble(8)) * coloured(white(), BUFFET))
    rumble = ratio(rumble_db - 3.5 + 1.8 * wobble(6)) * coloured(white(), RUMBLE)
    hum = ratio(-63) * at_table * resonant(resonant(white(), MOTOR_HUM), MOTOR_HUM)
    hush = ratio(-73.5 + 1.2 * wobble(3)) * coloured(white(), HUSH)
    return buffet + rumble + hum + hush


def scene():
    chopping = blows() + cuts() + smacks()
    rubbing = shifting(scraping() + grating(), depth_db=3.2)
    return (chopping + rubbing + knocks() + birds() + air())[None]


def top_cut(x):
    return signal.sosfilt(signal.butter(12, 16670, fs=SR, output="sos"), x)


def record(dry):
    m = next_fast_len(N)
    passed = np.fft.rfftfreq(m, 1 / SR) < 16600
    mix = irfft(rfft(dry, m) * passed, m)[:, :N]
    return top_cut(mix)


dry = scene()
out = record(dry)
unload_audio(out)
```